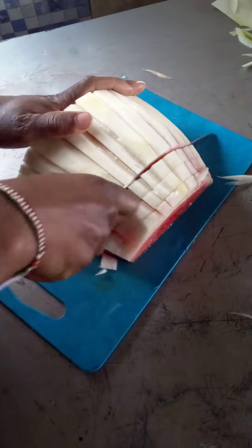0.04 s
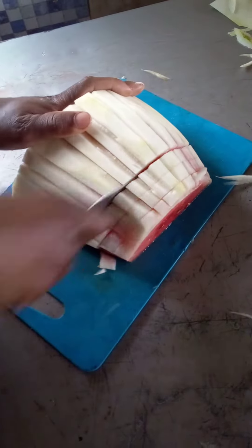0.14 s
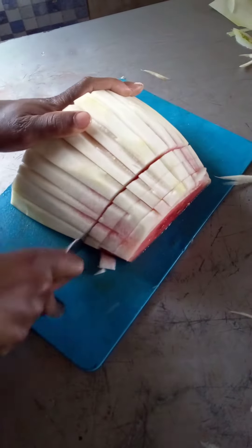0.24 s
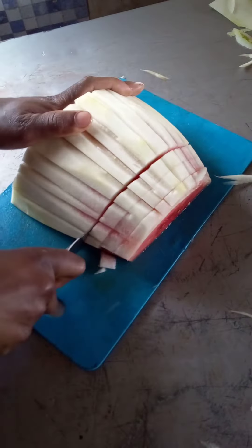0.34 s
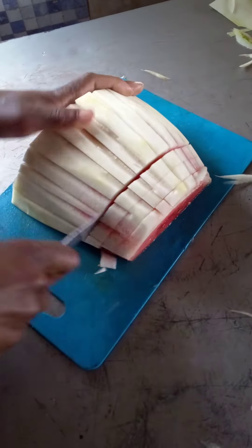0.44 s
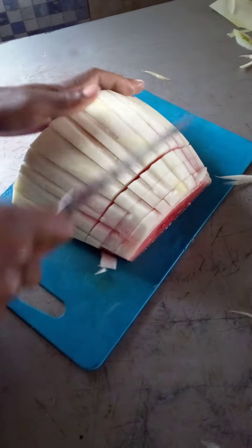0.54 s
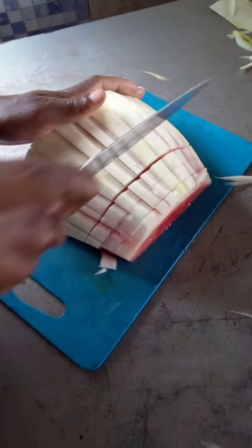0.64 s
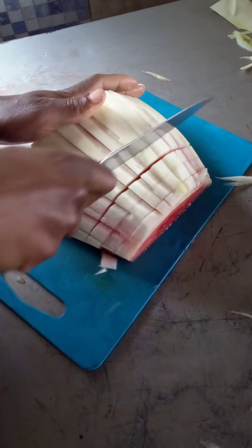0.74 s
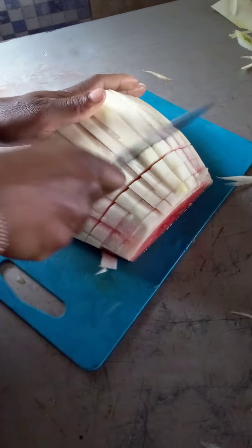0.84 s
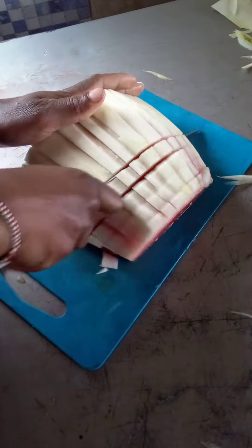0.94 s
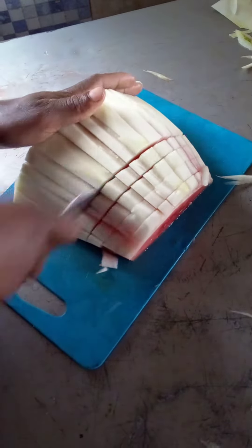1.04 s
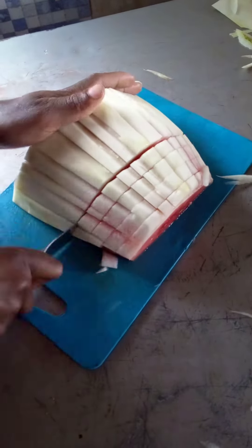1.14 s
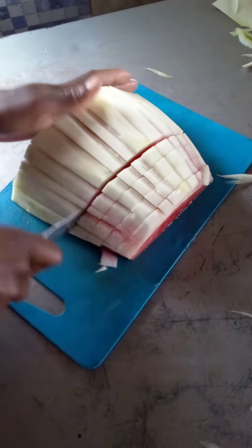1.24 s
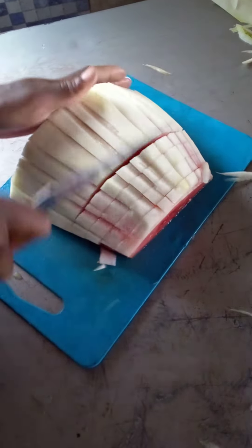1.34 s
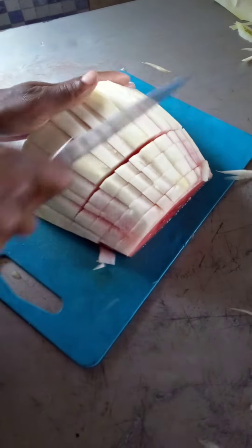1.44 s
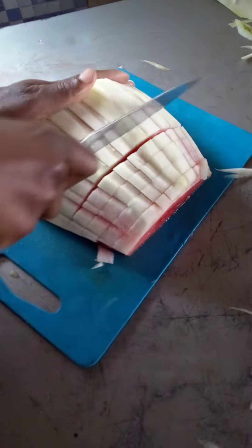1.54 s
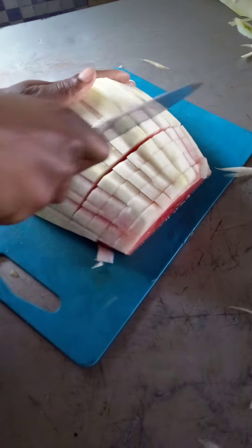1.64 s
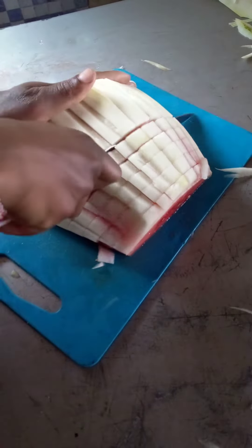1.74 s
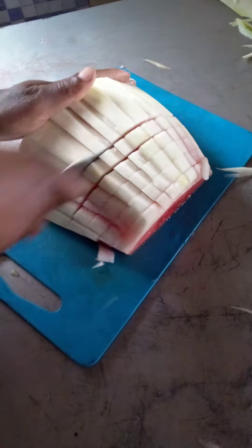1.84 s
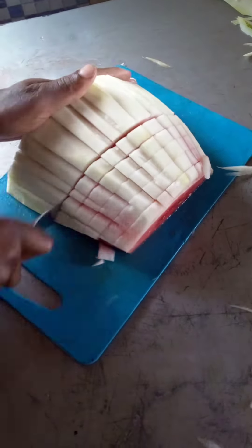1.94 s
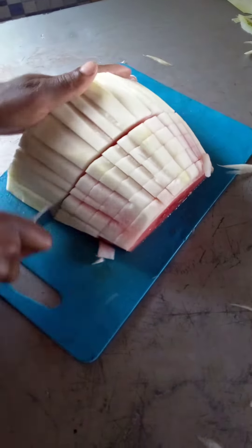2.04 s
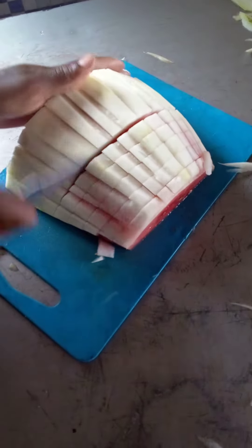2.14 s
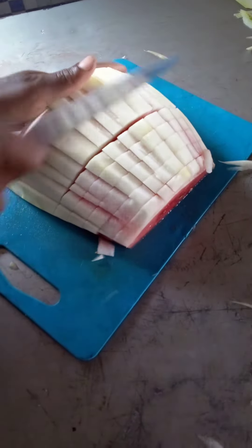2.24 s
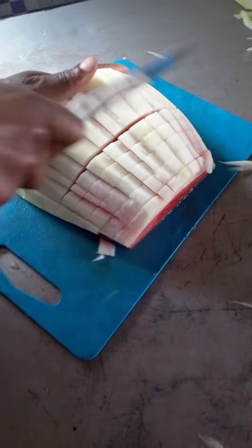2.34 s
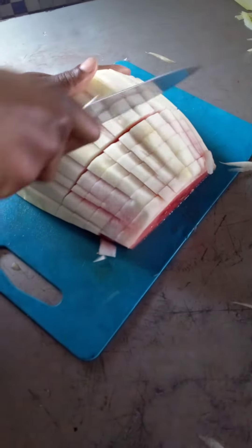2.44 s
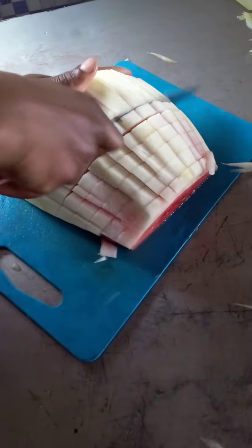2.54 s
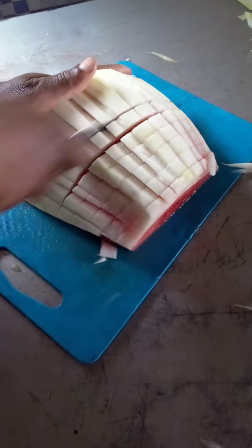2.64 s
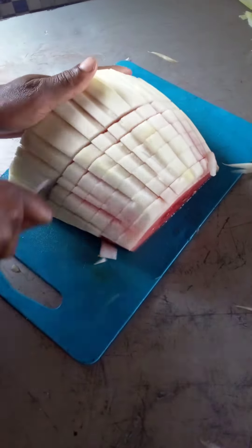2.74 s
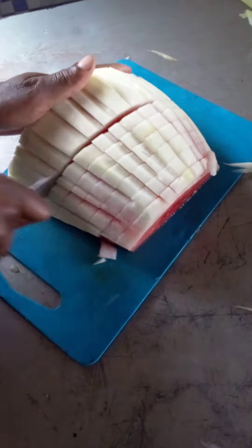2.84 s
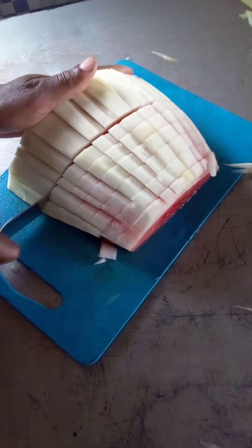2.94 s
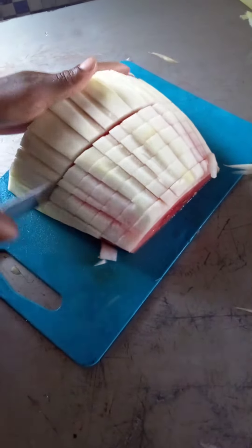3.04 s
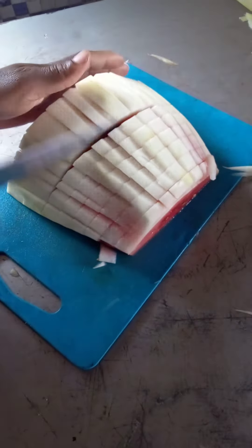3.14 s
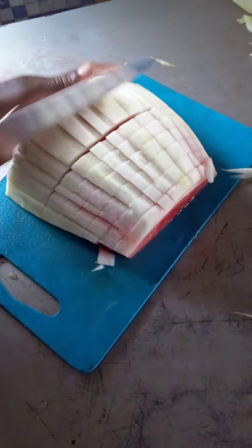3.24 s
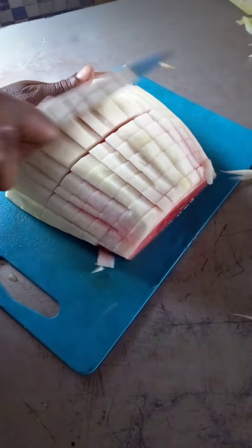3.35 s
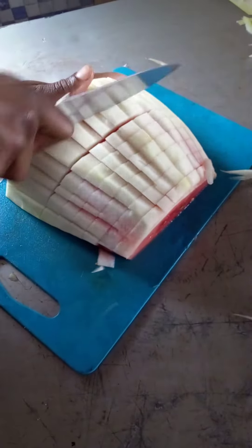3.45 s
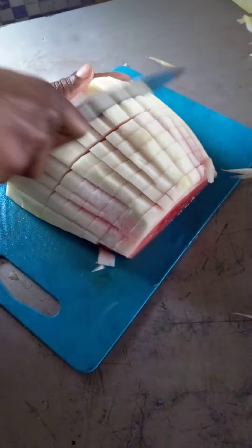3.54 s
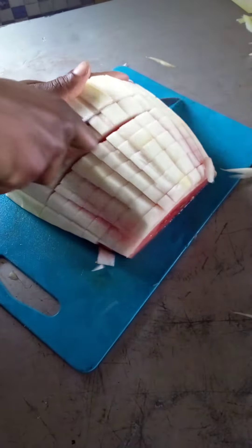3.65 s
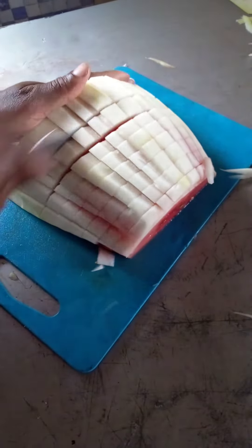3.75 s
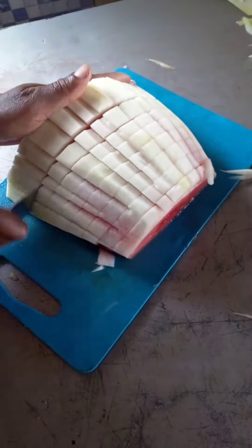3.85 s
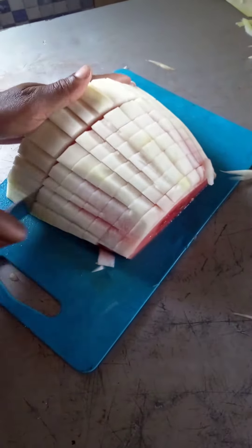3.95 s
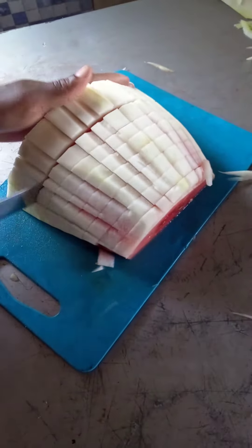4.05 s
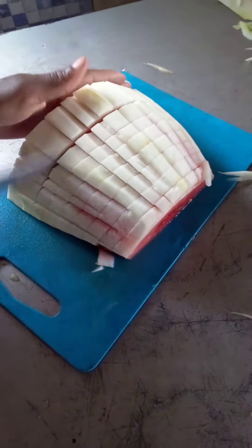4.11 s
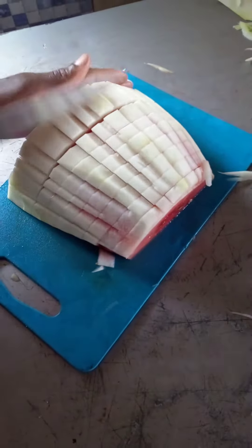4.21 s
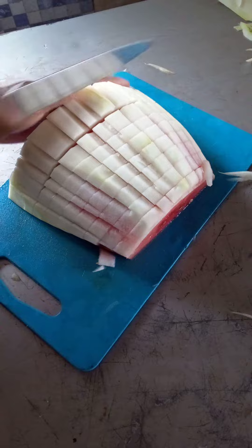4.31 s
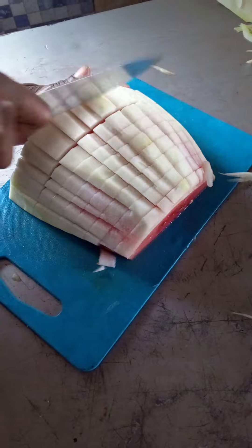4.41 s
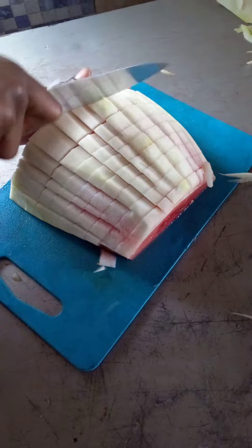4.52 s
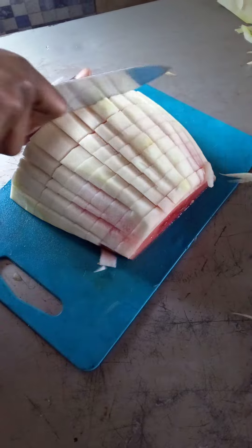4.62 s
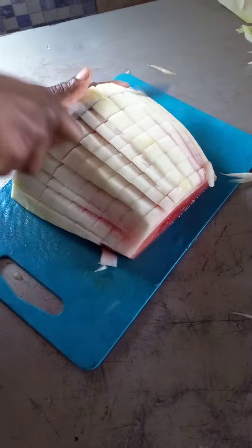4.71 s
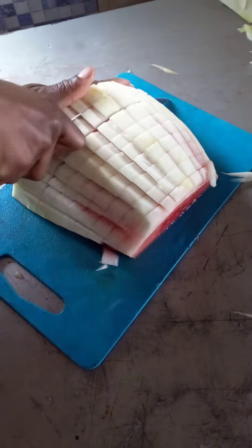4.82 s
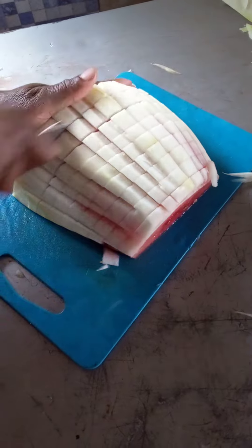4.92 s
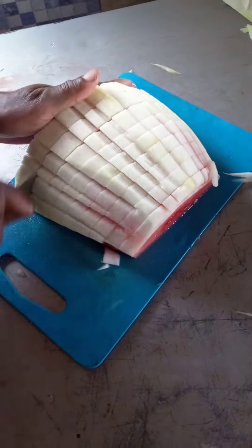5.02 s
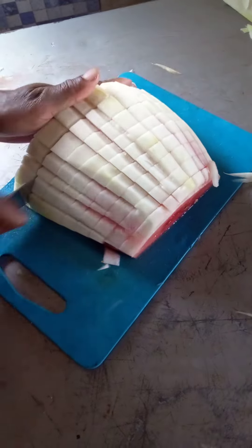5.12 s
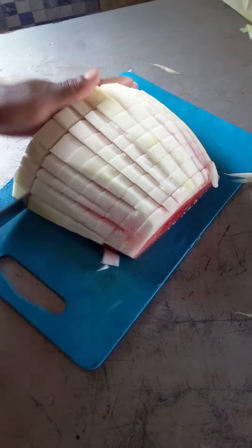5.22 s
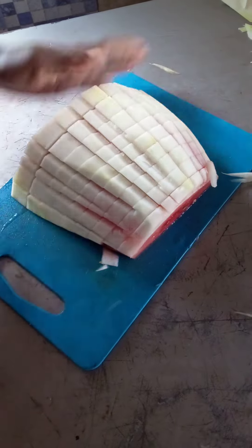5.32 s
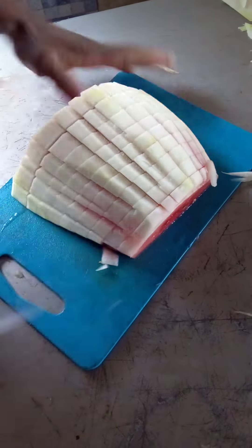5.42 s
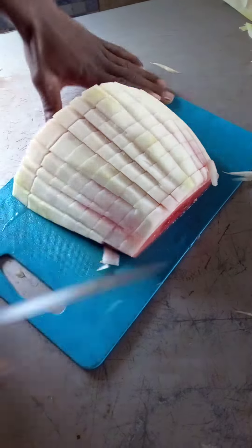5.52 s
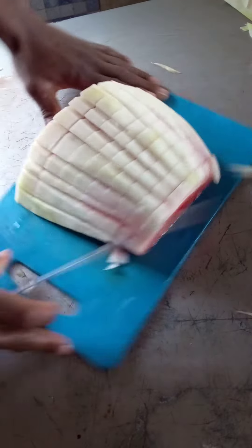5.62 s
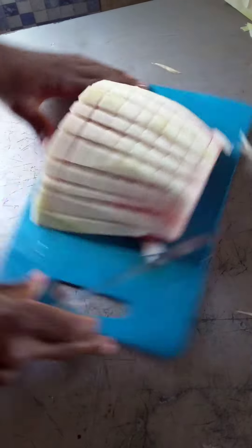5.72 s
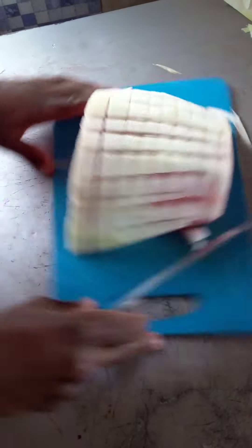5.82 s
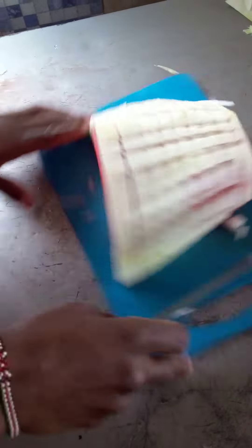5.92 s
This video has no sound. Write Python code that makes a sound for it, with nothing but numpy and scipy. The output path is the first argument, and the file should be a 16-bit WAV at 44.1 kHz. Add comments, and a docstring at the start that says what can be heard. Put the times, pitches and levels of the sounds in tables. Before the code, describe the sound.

Wet, crisp cuts through a watermelon mix with irregular thuds and clacks of a knife on a plastic board.

```python
"""A kitchen knife cuts a watermelon on a plastic board: a soft bump on the rind, a crunch through wet flesh,
then knocks on the board, often a bright clack of the tip before a dull thud of the heel.
Knocks and bumps are damped modes; crunch, fizz, chatter, skids and rustles are shaped noise or fracture trains.
Juice snaps are treble ticks. At the end the board is dragged, juddering and scraping.
A small room adds echoes and a tail; a steady air noise and hum lie beneath."""
import sys
import numpy as np
from scipy import signal
from scipy.fft import rfft, irfft
from scipy.io import wavfile
from scipy.ndimage import uniform_filter1d, minimum_filter1d

SR = 44100
rng = np.random.default_rng(int(sys.argv[2]) if len(sys.argv) > 2 else 0)


def wav_out(sig):
    """Save sig, one row per channel (or a flat mono array), as 16-bit PCM at SR to the path in sys.argv[1]."""
    wavfile.write(sys.argv[1], SR, np.round(np.clip(np.atleast_2d(sig).T, -1, 1) * 32767).astype(np.int16))


N = 263277
TIME_S = np.arange(N) / SR


def amp(db):
    """Decibels to gain."""
    return 10 ** (np.asarray(db) / 20)


def unit(x):
    """Scales to rms 1."""
    return x / np.sqrt(np.mean(x ** 2) + 1e-20)


def white():
    """White noise over the whole scene."""
    return rng.standard_normal(N)


def read(points, hz):
    """Interpolates (frequency, value) points along a log-frequency axis."""
    point_hz, value = np.transpose(points)
    return np.interp(np.log(hz + 1), np.log(point_hz + 1), value)


def add(mix, start_s, sound):
    """Mixes a sound in place, from start_s on."""
    part = mix[max(round(start_s * SR), 0):][:len(sound)]
    part += sound[:len(part)]


def lowpass(x, cutoff_hz):
    """First-order low-pass."""
    return signal.lfilter(*signal.butter(1, cutoff_hz, fs=SR), x)


def coloured(x, spectrum):
    """Filters a scene-long noise to a spectrum, at rms 1."""
    gain = amp(read(spectrum, np.fft.rfftfreq(N, 1 / SR)))
    return unit(irfft(rfft(x) * gain, N))


def impulse(spectrum, size=4096):
    """Minimum-phase pulse with the given spectrum."""
    log_gain = np.log(amp(read(spectrum, abs(np.fft.fftfreq(size, 1 / SR)))))
    causal = np.exp(np.conj(signal.hilbert(log_gain)))
    return np.fft.ifft(causal).real[:size // 2]


def resonance(x, hz, width_hz):
    """Passes a noise through one resonance, at rms 1."""
    offset = 2 * (np.fft.rfftfreq(len(x), 1 / SR) - hz) / width_hz
    return unit(irfft(rfft(x) / (1 + offset ** 2), len(x)))


def flutter(depth_db, size):
    """A gain that wanders at random over about size samples."""
    return amp(depth_db * unit(uniform_filter1d(white(), size=size)))


def grains(per_s, spread_db):
    """Random train of single-sample fractures; spread_db sets their unevenness, rms is 1."""
    size = amp(spread_db * np.minimum(rng.exponential(1, N), 4))
    sign = rng.choice([-1, 1], N)
    return unit(size * sign * (rng.random(N) < per_s / SR))


def tick(t_s, t60_s):
    """A short decaying burst of treble, at a fixed energy."""
    treble = signal.butter(2, 5500, "high", fs=SR, output="sos")
    burst = signal.sosfilt(treble, rng.standard_normal(len(t_s)))
    burst *= amp(-60 * t_s / t60_s)
    return burst / np.linalg.norm(burst) * 3.44


RISE_SHARE = 0.43  # part of a swell spent rising


def swells(rows, width=1.174, steep=2.28):
    """One smooth rise and fall of gain per row (time at the height [s], length [s], level [dB])."""
    out = np.zeros(N)
    for height_s, length_s, db in rows:
        near = abs(TIME_S - height_s) < 2 * length_s
        t_s = TIME_S[near] - height_s
        side_s = length_s * np.where(t_s < 0, RISE_SHARE, 1 - RISE_SHARE)
        out[near] += amp(db) * np.exp(-abs(t_s / (width * side_s)) ** steep)
    return out


# spectrum of the kitchen air: (frequency [Hz], density [dB per Hz])
AIR_SPECTRUM = [(20, -6), (45, 0.5), (70, -3.5), (170, -1.5), (300, -1.5), (500, -6.5), (1000, -12.5),
                (2000, -21.5), (3500, -25.5), (5300, -25.5), (9000, -33.5), (14000, -32)]
# hum bands: (frequency [Hz], width [Hz], level [dB])
HUM_BANDS = [(114.25, 2.1, -46), (245.7, 19.4, -48.5)]


def kitchen(air_db=-40.0, drift_db=1.3):
    """Gently drifting air noise, plus a wavering hum of narrow noise bands."""
    out = amp(air_db) * flutter(drift_db, size=6000) * coloured(white(), AIR_SPECTRUM)
    for hz, width_hz, db in HUM_BANDS:
        out += amp(db) * resonance(white(), hz, width_hz)
    return out


# near-wall reflections, before dulling: (delay [s], gain [linear])
WALL_ECHOES = [(.0055, -0.05), (.0088, 0.66), (0.0177, 0.1651), (0.027, 0.41)]
# decay of the tail: (frequency [Hz], t60 [s])
TAIL_T60 = [(150, 0.48), (400, 0.45), (1000, 0.43), (2700, 0.43), (6000, 0.6), (14000, 0.29)]
# spectrum of the tail: (frequency [Hz], level [dB])
TAIL_SPECTRUM = [(100, -7), (160, 0.5), (260, -2), (340, -7.5), (460, -2.5), (1100, -1.5), (1900, -2),
                 (3500, -7.5), (5500, -11.5), (13000, -34)]


def room(x, echo_hz=1500, build_s=0.0042):
    """A few dull early echoes, then a diffuse tail whose bands die at their own speeds."""
    early = np.zeros(SR)
    for delay_s, gain in WALL_ECHOES:
        add(early, delay_s, np.array([gain]))
    early = lowpass(early, min(echo_hz, SR / 4))

    hz, t_s, bands = signal.stft(rng.standard_normal(SR), SR, nperseg=256)
    t60_s = read(TAIL_T60, hz)[:, None]
    bands = bands * amp(-60 * t_s / t60_s) / np.sqrt(t60_s)
    tail = signal.istft(bands, SR, nperseg=256)[1][:SR]
    tail *= 1 - np.exp(-(np.arange(SR) / SR / build_s) ** 2)

    # the many modes share out the energy evenly over each band
    z = rfft(tail)
    z /= np.sqrt(uniform_filter1d(abs(z) ** 2, size=120) + 1e-20)
    z *= amp(read(TAIL_SPECTRUM, np.fft.rfftfreq(SR, 1 / SR)))
    tail = irfft(z, SR)[:SR * 3 // 4]
    return signal.fftconvolve(x, early[:len(tail)] + tail)[:N]


# hands change their grip: (time at the height [s], length [s], level [dB])
GRIP_SHIFTS = [(0.77, 0.13, -41.5), (4.46, 0.12, -38.5), (4.67, 0.11, -39), (5.45, 0.48, -47)]
# spectrum of a rustle: (frequency [Hz], density [dB per Hz])
RUSTLE_SPECTRUM = [(100, 14), (400, 1.5), (950, 3), (1600, -13), (5000, -14.5), (9000, -27)]


def rustles():
    """Hands shift on the melon and the handle: soft swells of fluttering noise."""
    return swells(GRIP_SHIFTS) * flutter(0.5, size=1200) * coloured(white(), RUSTLE_SPECTRUM)


# slide of the board, sets the scrape before SCRAPE_DB: (time [s], level [dB])
SLIDE_LEVEL = [(5.6, -64), (5.608, -48.5), (5.814, -48.5), (5.84, -36.5), (5.93, -45.5), (5.936, -37.5),
               (5.97, -48)]
# spectra of judder and of scraping grit: (frequency [Hz], density [dB per Hz])
JUDDER_SPECTRUM = [(45, -5), (64, 13.5), (90, -20), (125, 1), (170, 1), (245, -13), (420, 1), (1500, -28.5)]
SCRAPE_SPECTRUM = [(300, -4), (1000, 0), (2000, -2.5), (4500, 2), (9000, -6), (15000, -4.5)]
JUDDER_DB, JUDDER_POWER, SCRAPE_DB = -37.5, 0.15, 1.5  # judder: level at the hardest slide


def drag(catch_db=2):
    """Plastic catches and slips on the counter: the loaded board judders, grit scrapes under it."""
    slide = amp(np.interp(TIME_S, *np.transpose(SLIDE_LEVEL), left=-200))
    # judder grows more slowly than scrape
    judder_gain = amp(JUDDER_DB) * (slide / slide.max()) ** JUDDER_POWER
    judder = judder_gain * coloured(white(), JUDDER_SPECTRUM)
    grit = coloured(grains(per_s=2300, spread_db=1.0), SCRAPE_SPECTRUM)
    scrape = amp(SCRAPE_DB) * slide * grit
    return flutter(catch_db, size=700) * (judder + scrape)


# loudest wet snaps as the cut opens: (time [s], level [dB])
LOUD_SNAPS = [(2.509, -31), (2.857, -22.5), (3.078, -26.5), (5.116, -18), (5.194, -24)]
SNAPS_PER_S, SNAP_DB, SNAP_SPREAD_DB = 3, -37.5, 8  # the faint ones


def snaps():
    """Films of juice break: a few loud ticks and a random scatter of mostly faint ones."""
    out = np.zeros(N)
    t_s = np.arange(SR // 20) / SR
    times_s = TIME_S[rng.random(N) < SNAPS_PER_S / SR]
    faint = [(s, SNAP_DB + SNAP_SPREAD_DB * rng.standard_normal()) for s in times_s]
    for start_s, db in [*LOUD_SNAPS, *faint]:
        add(out, start_s, amp(db) * tick(t_s, t60_s=0.02))
    return out


SKID_DELAY_S, SKID_LENGTH_S, SKID_DB = 0.075, 0.04, -38.5  # level relative to the clack
SKID_HZ, SKID_WIDTH_HZ = 2450, 2100


def skids():
    """The tip slips along the board just after it strikes; the harder the clack, the louder the rasp."""
    rows = [(s + SKID_DELAY_S, SKID_LENGTH_S, blade_db + SKID_DB) for s, _, _, blade_db, _, _ in KNOCKS]
    return swells(rows) * resonance(grains(per_s=1200, spread_db=4.0), SKID_HZ, SKID_WIDTH_HZ)


# blade resonances set off by wet rind: (frequency [Hz], level [dB])
CHATTER_MODES = [(2250, -4.5), (3150, -3.5), (4070, -22), (5250, 0)]
CHATTER_DB, CHATTER_POWER = -39.5, 1.16  # gain in the hardest stroke; power of crunch x fizz


def chatter(grip, width_hz=520, flutter_db=4):
    """Under pressure and juice the rind slips unevenly on steel, sounding now one resonance, now another."""
    slips = grains(per_s=1500, spread_db=0.0)
    steel = np.zeros(N)
    for hz, db in CHATTER_MODES:
        steel += amp(db) * flutter(flutter_db, size=900) * resonance(slips, hz, width_hz)
    return amp(CHATTER_DB) * (grip / grip.max()) ** CHATTER_POWER * steel


# wet strokes of blade and hand on the melon, mostly cuts, a few faint handling sounds:
# (time at the height [s], length [s], rind crunch level [dB], juice fizz level [dB])
WET_STROKES = [ (0.095, 0.16, -39.5, -41), (0.321, 0.056, -45.5, -43.5), (0.991, .12, -36, -40.5),
               (1.198, 0.063, -48.5, -44.5), (1.577, 0.031, -59, -45.5), (1.816, 0.11, -39, -42),
               (2.028, 0.11, -43.5, -42.5), (2.262, 0.073, -55, -58), (2.618, 0.1, -42, -42),
               (2.814, 0.11, -43.5, -45.5), (3.04, 0.034, -43, -42.5), (3.172, 0.085, -51, -46.5),
               (3.679, 0.11, -43, -42), (3.922, 0.13, -44.5, -40.5), (4.101, 0.069, -48.5, -50),
               (4.337, 0.074, -53.5, -52), (4.791, 0.18, -43, -40.5), (5.103, 0.15, -43.5, -44),
               (5.306, 0.12, -39, -36.5), ]
# spectra of rind, juice and the hand's push: (frequency [Hz], density [dB per Hz])
CRUNCH_SPECTRUM = [(300, 2), (700, 1), (1500, -4.5), (2300, -2.5), (3800, 1), (5300, 1), (7000, -4),
                   (10000, -46)]
FIZZ_SPECTRUM = [(3000, -18), (7000, -2), (10000, 3), (12500, 2.5), (15000, 4), (17000, -31.5)]
PUSH_SPECTRUM = [(40, 7.5), (110, 6.5), (300, -6), (600, -0.5), (1200, -21)]


def wet_strokes(push_db=2, clump_db=3.0):
    """Rind cells burst in clumps and juice fizzes while the hand presses down."""
    crunch = swells([(s, length_s, db) for s, length_s, db, _ in WET_STROKES])
    fizz = swells([(s, length_s, db) for s, length_s, _, db in WET_STROKES])
    clumps = flutter(clump_db, size=300)
    rind = clumps * coloured(grains(per_s=2500, spread_db=1.7), CRUNCH_SPECTRUM)
    juice = np.sqrt(clumps) * coloured(white(), FIZZ_SPECTRUM)
    push = amp(push_db) * coloured(white(), PUSH_SPECTRUM)
    return crunch * (rind + push) + fizz * juice + chatter(crunch * fizz)


# blade lands on the rind, melon bobs: (time [s], level [dB], frequency [Hz])
RIND_BUMPS = [(0.057, -26, 74), (0.362, -25.5, 69.6), (0.83, -20.5, 91), (0.937, -23, 109),
              (1.643, -21, 99), (2.481, -21, 94.4), (2.607, -30, 85), (3.487, -25.5, 101),
              (3.662, -29, 148)]
SKIN_DB = -11.5  # tick of the broken skin, relative to its bump


def bumps(rise_s=0.0073):
    """The edge nicks the skin and the melon bobs for a few cycles on its soft flesh."""
    out = np.zeros(N)
    t_s = np.arange(SR // 6) / SR
    swell = (t_s / rise_s * np.exp(1 - t_s / rise_s)) ** 2
    for start_s, db, hz in RIND_BUMPS:
        bob = swell * np.sin(2 * np.pi * hz * t_s)
        skin = amp(SKIN_DB) * tick(t_s, t60_s=0.027)
        add(out, start_s, amp(db) * (bob + skin))
    return out


def ring(modes, place, t_s, depth=0.48, contact_s=0.00035):
    """Damped modes set off by one blow; bending waves weight each by the place of contact."""
    hz, db, t60_s = np.transpose(modes)[:, :, None]
    share = 1 + depth * np.cos(2 * np.pi * place * np.sqrt(hz / 1000))
    waves = share * amp(db - 60 * t_s / t60_s) * np.sin(2 * np.pi * hz * t_s)
    return waves.sum(0) * (1 - np.exp(-t_s / contact_s))


def crowd(strong, spectrum, t_s, t60_s, db):
    """Many weak, close modes blur into a short burst; its energy follows the strong modes."""
    noise = rng.standard_normal(len(t_s)) * amp(-60 * t_s / t60_s)
    burst = signal.fftconvolve(noise, impulse(spectrum))[:len(t_s)]
    return amp(db) * np.linalg.norm(strong) * burst / np.linalg.norm(burst)


def splash(strong, spectrum, db):
    """All modes heard from all sides: one smooth pulse; its energy follows the strong modes."""
    pulse = impulse(spectrum)
    return -amp(db) * np.linalg.norm(strong) * pulse / np.linalg.norm(pulse)


# knife meets board: (time [s], thud level [dB], board ring level before cushioning [dB],
# blade clack level [dB], edge tick level [dB], place of contact [bending wavelengths at 1 kHz])
KNOCKS = [ (0.1125, -3, -7.5, -1, -13, 2.62), (0.3224, -2, -18.5, -32, -19, 1.33),
          (0.3613, -19, -17.5, -51, -46, 1.17), (0.376, -19, -21.5, -43, -41, 1.3),
          (1.006, -3.5, -9, 2, -18, 1.057), (1.2028, -8.5, 0, -25, -31, 0.41),
          (1.839, -3.5, -8, -0.5, -10, 1.05), (2.0274, -5.5, -1, -14.5, -33, 0.34),
          (2.8237, -2.5, -3, -21.5, -27, 1.3), (3.0345, -18, -27, -38, -23, 1.2),
          (3.709, -21, -23.5, -29, -32, 2.03), (3.905, -1, -3, -10.5, -37, 2.79),
          (3.9638, -14.5, -12, -15, 1.5, 0.92), (4.832, -18.5, -30, -39, -45, 2.7),
          (5.0842, -6.5, -5, -18.5, -34, 2.9), ]
# board's dead thud under the melon's weight: (frequency [Hz], level [dB])
THUD_SPECTRUM = [(40, -36), (100, -15), (190, -2), (300, -1), (400, -4), (560, -24), (900, -40.5),
                 (2500, -34.5)]
# strong modes of board and blade: (frequency [Hz], level [dB], t60 [s])
BOARD_MODES = [(342, -15, 0.044), (507, -4, 0.023), (737, -3.5, 0.016), (1010, -4.5, 0.014),
               (1303, -3.5, 0.014), (1830, -1.5, 0.0069), (2490, 9, 0.0028), (3710, -4.5, 0.0079)]
BLADE_MODES = [(2150, -8, 0.025), (2644, 5, 0.0058), (3040, 3.5, 0.0042), (3920, -0.5, 0.0037),
               (4555, 9.5, 0.0032), (5070, -5.5, 0.0065)]
# weak modes of board and counter, and of blade and handle: (frequency [Hz], level [dB])
BOARD_CROWD = [(150, -13), (350, 9.5), (600, 0), (1200, -2.5), (2000, -5.5), (3000, -13), (5500, -19.5),
               (9000, -82)]
BLADE_CROWD = [(400, -43), (1000, -6), (2300, 6.5), (3900, -16.5), (5400, 0.5), (7000, -6), (14000, -12)]
CUSHION_HZ, CUSHION_POWER = 2400, 0.32  # cut-off at clack = thud; power of their ratio
KNOCK_ROOM_DB = -0.5


def knocks():
    """Each blow thuds, rings the board and clacks the blade; returns (near sound, room send)."""
    near, sent = np.zeros((2, N))
    thud_shape = impulse(THUD_SPECTRUM)
    t_s = np.arange(len(thud_shape)) / SR
    thud_shape = -thud_shape / abs(thud_shape).max()  # the board first moves away
    for start_s, thud_db, board_db, blade_db, tick_db, place in KNOCKS:
        thud = amp(thud_db) * thud_shape
        # the less steel meets the board, the more flesh takes away the upper modes
        cushion_hz = min(CUSHION_HZ * amp(blade_db - thud_db) ** CUSHION_POWER, SR / 4)
        board = amp(board_db) * lowpass(-ring(BOARD_MODES, place, t_s), cushion_hz)
        clack = amp(blade_db) * ring(BLADE_MODES, place, t_s)
        blade = clack + amp(tick_db) * tick(t_s, t60_s=0.0085)
        board_blur = crowd(board, BOARD_CROWD, t_s, t60_s=0.09, db=-3.5)
        blade_blur = crowd(blade, BLADE_CROWD, t_s, t60_s=0.05, db=-9.5)
        add(near, start_s, thud + board + blade + board_blur + blade_blur)
        # strong modes beam at the microphone; the room hears the whole crowd
        spread = splash(board, BOARD_CROWD, db=-2) + splash(blade, BLADE_CROWD, db=-7.5)
        add(sent, start_s, 0.81 * thud + 0.083 * (board + blade) + spread)
    return near, amp(KNOCK_ROOM_DB) * sent


def scene(soft_room_db=-5):
    """Knife, melon and board in the kitchen."""
    near, sent = knocks()
    soft = bumps() + wet_strokes() + skids() + snaps() + rustles() + drag()
    sent = sent + amp(soft_room_db) * soft
    # successive knocks take turns through four random room tails, so no single draw colours them all
    knock_index = np.searchsorted([row[0] - 0.005 for row in KNOCKS], TIME_S)
    wet = sum(room(sent * (knock_index % 4 == k)) for k in range(4))
    return (near + soft + wet + kitchen())[None]


# microphone, weak in deep bass and in a treble trough: (frequency [Hz], gain [dB])
MIC_RESPONSE = [(15, -30), (40, -11.5), (60, 0.5), (5700, -0.5), (6500, -13), (7700, -15), (9000, -8),
                (10500, -4.5), (12000, -1), (14500, -1), (16000, -16)]
EDGE_HZ = 15900


def record(dry):
    """Microphone colour, a fast limiter at full scale, and the band limit."""
    x = signal.fftconvolve(dry[0], impulse(MIC_RESPONSE))[:N]
    gain = minimum_filter1d(1 / np.maximum(abs(x), 1), size=21)
    gain = uniform_filter1d(gain, size=21)
    band = signal.firwin(401, EDGE_HZ, window=("kaiser", 9), fs=SR)
    return signal.oaconvolve(x * gain, band, "same")[None]


dry = scene()
out = record(dry)
wav_out(out)
```